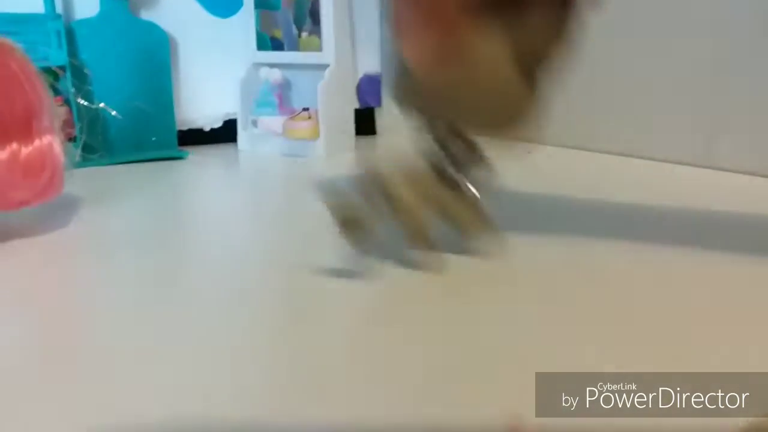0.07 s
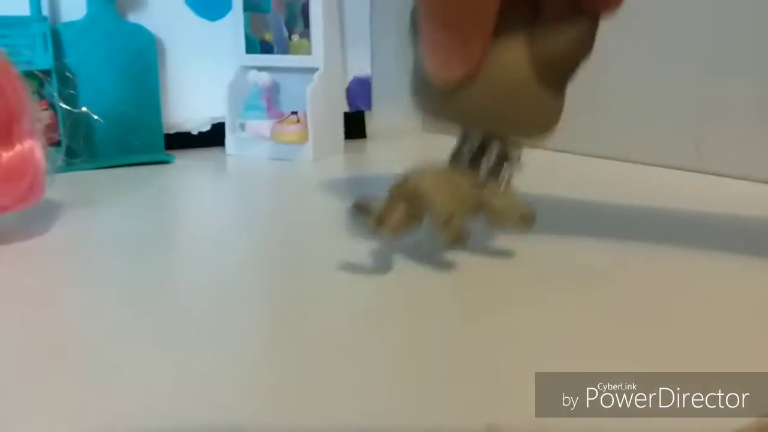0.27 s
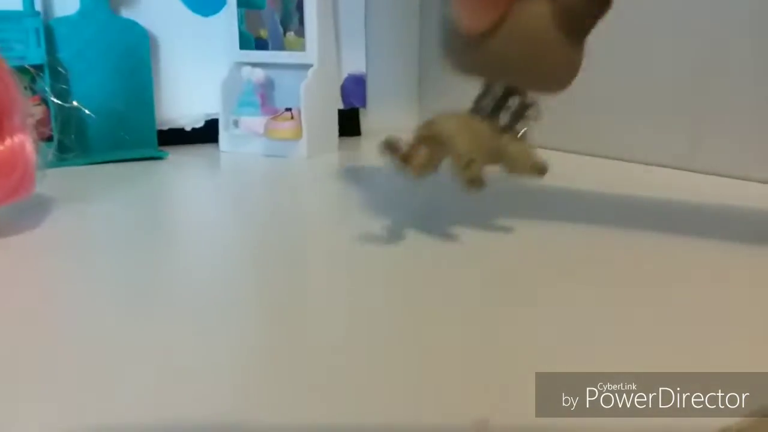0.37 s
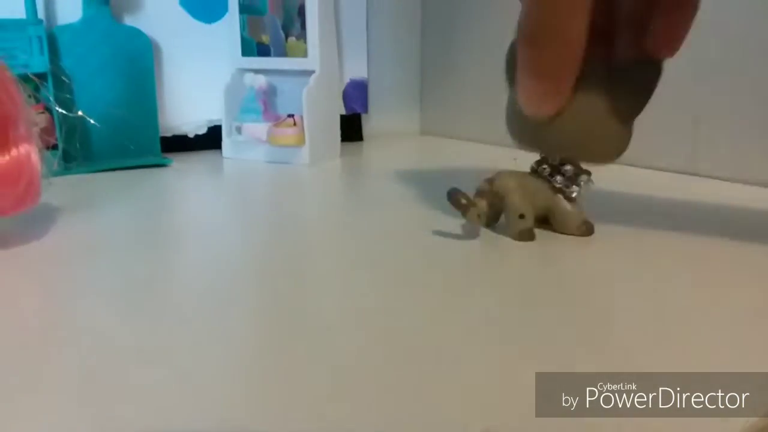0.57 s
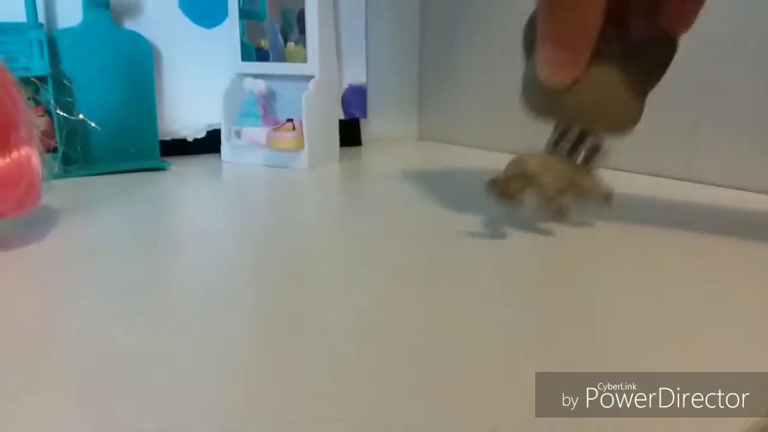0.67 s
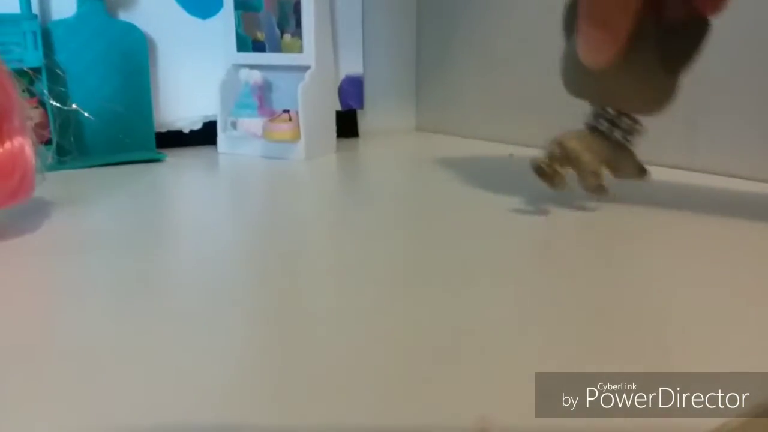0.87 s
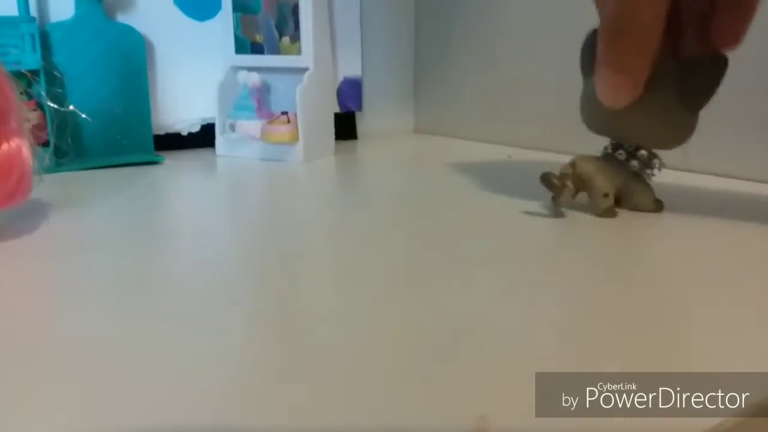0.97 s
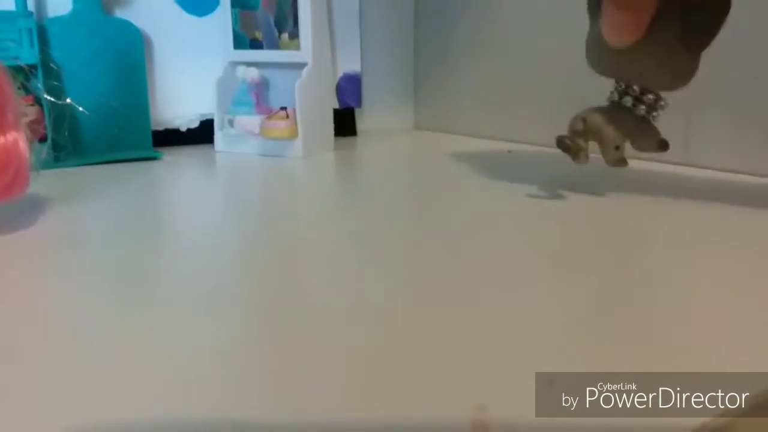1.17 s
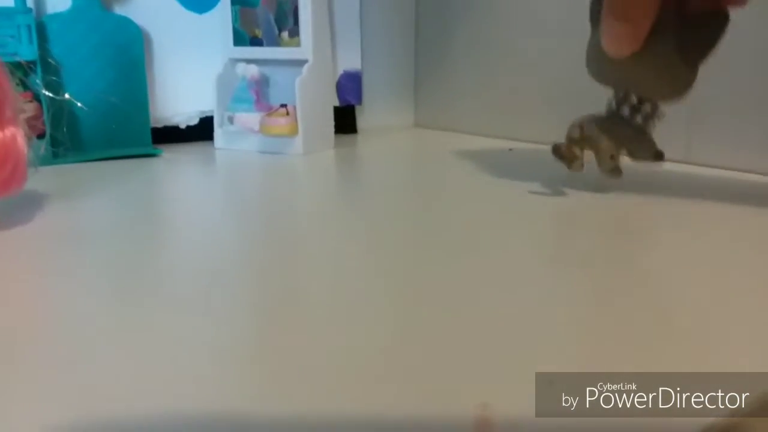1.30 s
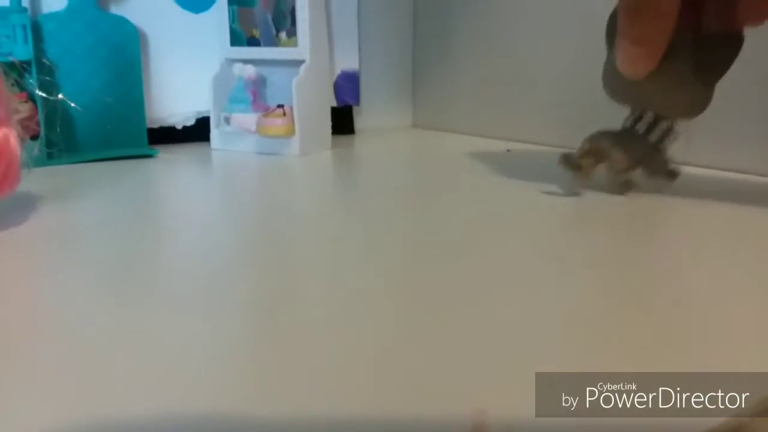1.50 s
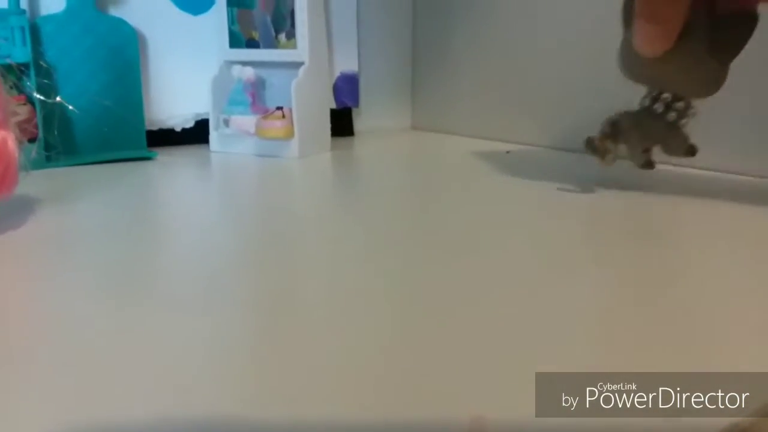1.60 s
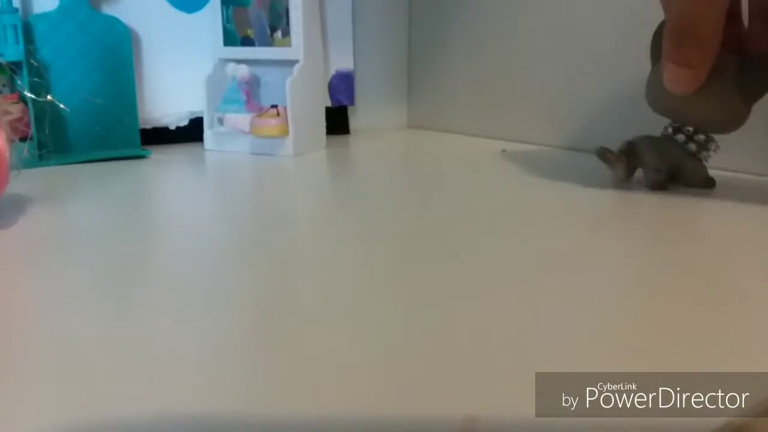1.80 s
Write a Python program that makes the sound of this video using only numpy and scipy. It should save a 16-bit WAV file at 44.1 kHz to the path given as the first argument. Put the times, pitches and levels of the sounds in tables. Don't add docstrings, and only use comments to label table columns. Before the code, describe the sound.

Close to the microphone, a plastic toy clacks along a hard tabletop, each landing a quick double tap and a light late tick, weakening as it goes, over low room rumble, hiss and distant machine hum.

```python
import sys
import numpy as np
from scipy import signal
from scipy.fft import rfft, irfft, next_fast_len
from scipy.io import wavfile
from scipy.ndimage import uniform_filter1d, map_coordinates

SR = 44100
rng = np.random.default_rng(int(sys.argv[2]) if len(sys.argv) > 2 else 0)


def level_to_linear(level):
    exponent = np.asarray(level, float) / 20
    return 10 ** exponent


def generate_wav(sig):
    pcm = np.round(np.clip(np.atleast_2d(sig).T, -1, 1) * 32767).astype(np.int16)
    wavfile.write(sys.argv[1], SR, pcm)


N = 81585


def unit(x):
    return x / np.sqrt(np.mean(x ** 2) + 1e-20)


def along(points, hz):
    f, v = np.transpose(points)
    return np.interp(np.log(hz + 1), np.log(f + 1), v)


def wobble(rate_hz):
    knots = rng.standard_normal(int(N * rate_hz / SR) + 4)
    return map_coordinates(knots, [np.arange(N) * rate_hz / SR])


def filtered(x, response):
    m = next_fast_len(x.shape[-1] + 8192)
    return irfft(rfft(x, m) * response(np.fft.rfftfreq(m, 1 / SR)), m)[..., :x.shape[-1]]


def stereo_noise(gain, alike):
    def response(hz):
        turn = np.arccos(np.clip(along(alike, hz), -1, 1)) / 2
        return gain(hz) * [np.cos(turn), np.sin(turn)]

    mid, side = filtered(rng.standard_normal((2, N)), response)
    return unit(np.array([mid + side, mid - side]))


def room():
    # (frequency [Hz], width [Hz], level [dB])
    room_modes = [(64.2, 12, 2), (85, 10, 1.5), (122, 20, -2.5), (160, 8.8, -5), (231.5, 77, -11),
                  (280, 30, -45), (394, 30, -30.5), (407, 13, -26.5)]
    # (frequency [Hz], left-right likeness [-1..1])
    likeness = [(60, 0.97), (240, 1), (950, 1), (3770, -0.01), (15000, -0.3)]
    # (time [s], level [dB])
    swell_points = [(0.0, -51), (0.096, -67.5), (0.256, -53.5), (0.292, -62), (0.632, -54), (1.838, -59),
                    (1.85, -60.5)]
    # (frequency [Hz], density [dB per Hz])
    hiss_colour = [(300, -32.5), (480, -10), (700, -4), (1200, -10), (2200, -9), (5000, -12.5),
                   (15600, -11.5)]
    rumble_db, hiss_db, swell_below_hz = -57, -75.5, 140

    def resonance(f):
        return np.sqrt(sum(level_to_linear(db) ** 2 / (1 + ((f - centre) / (width / 2)) ** 2) ** 2
                           for centre, width, db in room_modes))

    rumble = level_to_linear(rumble_db) * stereo_noise(resonance, likeness)
    deep = filtered(rumble, lambda f: f < swell_below_hz)
    swell_db = np.interp(np.arange(N) / SR, *np.transpose(swell_points))
    rumble = rumble + deep * (level_to_linear(swell_db - swell_db.mean()) - 1)
    hiss = level_to_linear(hiss_db) * stereo_noise(lambda f: level_to_linear(along(hiss_colour, f)), likeness)
    return rumble + hiss


def hum():
    hum_hz, drift_hz, swing_db = 217.7, 1.5, 2.2
    hum_db, overtone_db = -61.5, -86
    side_rad, side_db = .3, 4.5
    phase = 2 * np.pi * np.cumsum(hum_hz + drift_hz * wobble(4.9)) / SR
    swing = np.sqrt(2) * level_to_linear(swing_db * wobble(15))
    tone = np.array([np.sin(phase + side * side_rad) * level_to_linear(side * side_db) for side in (1, -1)])
    return swing * (level_to_linear(hum_db) * tone + level_to_linear(overtone_db) * np.sin(2 * phase))


def dying(noise, t60s, gain):
    patchy_db = 2
    hz, t, z = signal.stft(noise, SR, nperseg=128)
    patches = uniform_filter1d(rng.standard_normal(z.shape[1:]), size=3, axis=0)
    patches = uniform_filter1d(patches, size=4, axis=1)
    decay_db = -60 * t / np.abs(along(t60s, hz))[:, None]
    z = z * gain(hz)[:, None] * level_to_linear(patchy_db * unit(patches) + decay_db)
    return signal.istft(z, SR, nperseg=128)[1][..., :noise.shape[-1]]


def ring(t, drive_db, tone):
    # (frequency [Hz], t60 [s])
    top_modes = [(203, .2), (298, 0.083), (400, 0.088), (595, 0.1), (760, 0.11), (890, 0.032), (1062, .07),
                 (1190, 0.089), (1300, .07), (1550, .08), (1770, 0.054), (2230, 0.025), (2610, 0.023),
                 (2880, 0.035)]
    scatter_db, detune = 1.5, .006
    port_skew_db, ports_part_hz = 4, 486
    hz, t60 = np.transpose(top_modes)[:, :, None]
    size, skew, turn, shift = rng.standard_normal((4, len(hz), 1))
    part = np.minimum(hz / ports_part_hz, 1)
    mode_db = np.array(drive_db)[:, None] + scatter_db * size - 60 * t / t60
    phase = 2 * np.pi * hz * (1 + detune * shift) * t
    ports = []
    for side in (.5, -.5):
        modes = level_to_linear(mode_db + port_skew_db * side * skew) * np.sin(phase + side * part * turn)
        ports.append((tone(hz) * modes).sum(axis=0))
    return np.array(ports)


def clatter_and_walls(t, rise, tone):
    # (frequency [Hz], density [dB per Hz])
    plate_colour = [(90, -41), (200, -13), (1000, -7.5), (2300, 1), (3400, -6.5), (4600, -16), (6500, -28),
                    (15500, -42)]
    # (frequency [Hz], t60 [s])
    plate_t60 = [(200, 0.16), (800, 0.17), (2000, 0.018), (4000, 0.01), (9000, .02)]
    # (frequency [Hz], t60 [s])
    wall_t60 = [(200, 0.39), (1000, 0.31), (2500, 0.18), (6000, 0.17), (12000, 0.16)]
    # (delay [s], level [dB])
    corner_echoes = [(.0033, 0), (.0056, -5.5), (.0097, -6)]
    snap_db, snap_t60_s = 10, 0.0074
    alike, walls_db = .65, -12.5

    def plain(f):
        return level_to_linear(along(plate_colour, f))

    norm = np.sqrt(np.mean(plain(np.linspace(0, SR / 2, num=512)) ** 2))

    def colour(f):
        return plain(f) * tone(f) / norm

    a, b = rng.standard_normal((2, len(t)))
    near = np.array([a, alike * a + np.sqrt(1 - alike ** 2) * b])
    direct = dying(near, plate_t60, colour) * (1 + level_to_linear(snap_db - 60 * t / snap_t60_s)) * rise
    clatter = direct.copy()
    for delay_s, loss_db in corner_echoes:
        late = np.pad(direct, ((0, 0), (round(delay_s * SR), 0)))[:, :len(t)]
        clatter += level_to_linear(loss_db) * late
    walls = dying(rng.standard_normal((2, len(t))), wall_t60, colour)
    return clatter + level_to_linear(walls_db) * walls * rise ** 2


def tap(drive_db, thud_db, clack_db, fizz_db):
    rise_s, ring_db, clatter_db = .0006, -9.5, -14.5
    t = np.arange(SR // 2) / SR
    rise = 1 - np.exp(-t / rise_s)

    def tone(f):
        return level_to_linear(along([(275, thud_db), (550, 0), (900, 0), (2500, clack_db), (7600, fizz_db)], f))

    ringing = ring(t, drive_db, tone) * rise
    return level_to_linear(ring_db) * ringing + level_to_linear(clatter_db) * clatter_and_walls(t, rise, tone)


def toy():
    # (time [s], strength [dB], thud [dB], clack [dB], fizz [dB]), last three over the body
    hops = [(0.219, -17, -2, -11.5, 10), (0.2282, -11.5, 2, 7.5, 5.5), (.3100, -33.5, -9.5, -7.5, 5.5),
            (0.6302, -23, -1, -0.5, 9), (0.6433, -13.5, -3.5, 4, 2.5), (0.7121, -40, 8, 0, 17.5),
            (1.0506, -29, -5.5, -21, -4.5), (1.0565, -29.5, 1, -16, -14), (1.0695, -42, 17, 0, 6.5),
            (1.0822, -20.5, -3.5, -11, -19), (1.1330, -34.5, 5, -5, 0.5), (1.4841, -27, 4, -2.5, 7.5),
            (1.4919, -32.5, 9.5, -4, -16), (1.5052, -48, -3, 11.5, 15.5), (1.5088, -25.5, 1.5, 2.5, -2),
            (1.5668, -39, 7, -1, 7)]
    # (time [s], strength [dB], thud [dB], clack [dB], fizz [dB])
    strays = [
        (-.012, -30.5, -1.5, 1, 2),
        (.021, -46.5, 3.5, -1, -13),
        (.196, -65.5, -9.5, 2, 4.5),
        (1.8478, -53, -4, -2.5, 7),
    ]
    spots_db = [
        [-2, -7.5, -12, 1, -10.5, 14.5, 6, -26, -31, -8.5, -7, -2.5, -22, -24],
        [-4, 0, -8, -2.5, -6.5, -6.5, -13, -4.5, -7, -11, -5, -10.5, -11, 1.5],
        [1, -4.5, -8.5, -13.5, -2.5, 0, -8, 2, 6, -4, -4.5, -7, -10.5, -7.5],
        [2.5, -8.5, -5.5, -8.5, -8.5, 3, -10, -1, 0, -3.5, -11.5, -5.5, -4, -12],
        [2.5, -7, -9.5, -4.5, -8.5, -18, -8, -2, -16, -22, -14, -3, -1, -38],
    ]
    leaves_s = [
        .1,
        .5,
        .9,
        1.3,
    ]
    # (time [s], left over right [dB])
    pan_path = [(0.201, 5), (.65, 5), (1.1, 5), (1.6, 3)]
    # (time [s], right port lag [s])
    lag_path = [(.2, .00046), (1.2, .00041), (1.45, .00005)]
    lead, low_cut_hz = 4096, 210
    out = np.zeros((2, lead + N + SR))
    for s, db, *colour_db in hops + strays:
        spot = np.searchsorted(leaves_s, s)
        left, right = level_to_linear(db) * tap(spots_db[spot], *colour_db)
        pan_db = np.interp(s, *np.transpose(pan_path))
        lag_s = np.interp(s, *np.transpose(lag_path))
        out[0, lead + round(s * SR):][:len(left)] += level_to_linear(pan_db / 2) * left
        out[1, lead + round((s + lag_s) * SR):][:len(right)] += level_to_linear(-pan_db / 2) * right
    low_cut = lambda f: (1j * f / (low_cut_hz + 1j * f)) ** 2
    return filtered(out, low_cut)[:, lead:lead + N]


def scene():
    return room() + hum() + toy()


def top_cut(x):
    return signal.sosfilt(signal.butter(12, 16250, fs=SR, output="sos"), x)


def record(dry):
    top_hz = 15700
    mix = filtered(dry, lambda f: f < top_hz)
    return top_cut(mix)


dry = scene()
out = record(dry)
generate_wav(out)
```